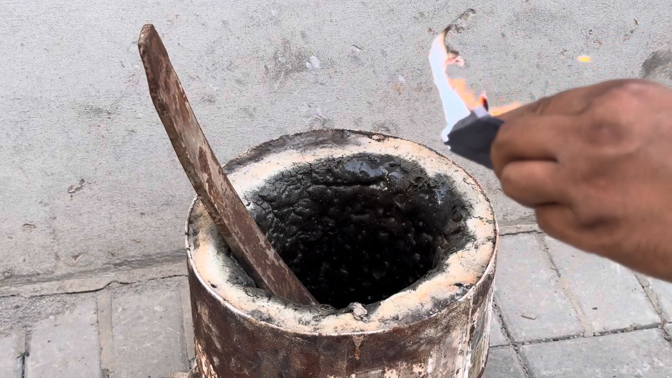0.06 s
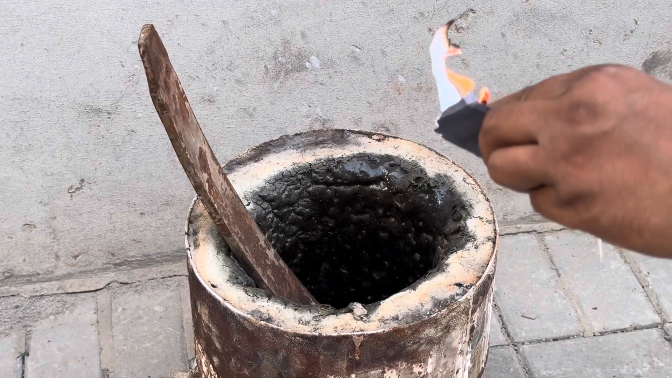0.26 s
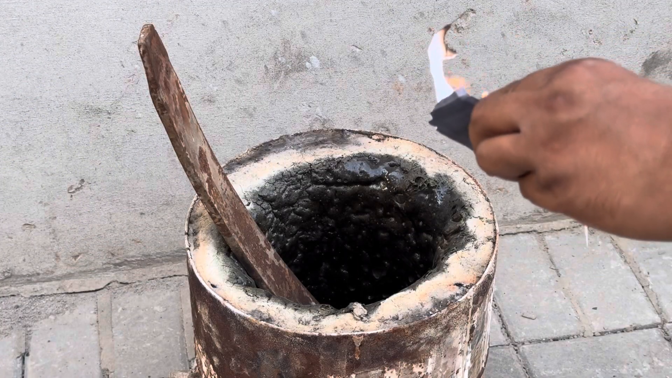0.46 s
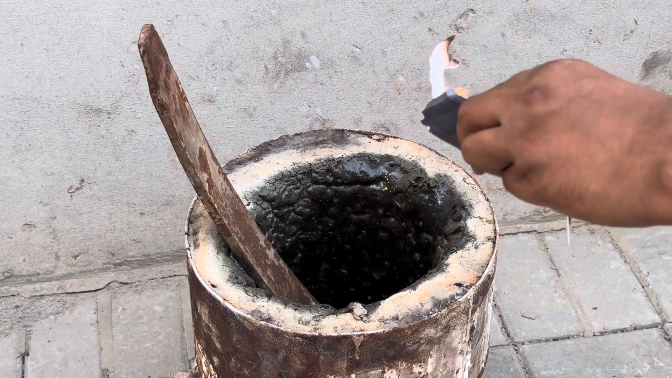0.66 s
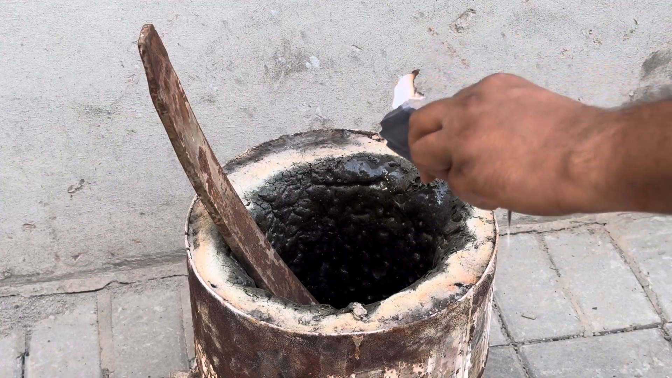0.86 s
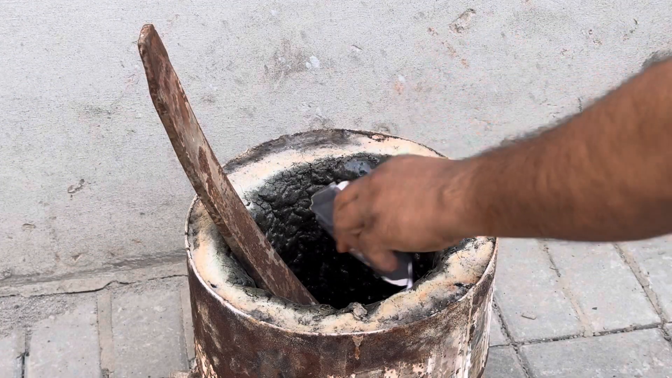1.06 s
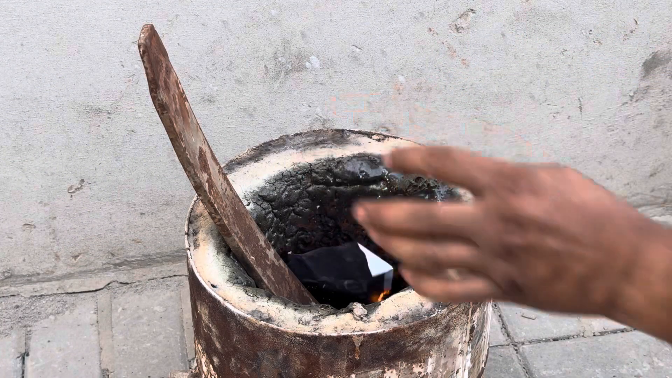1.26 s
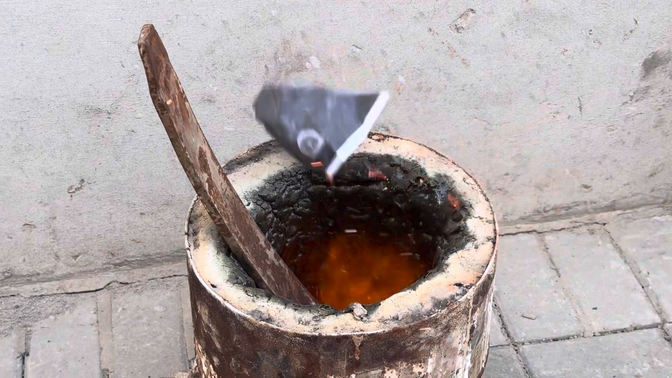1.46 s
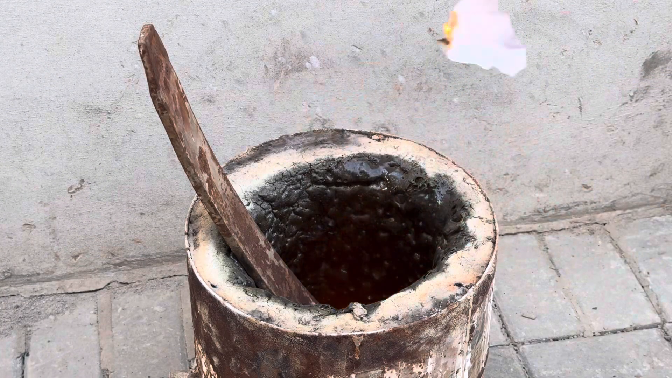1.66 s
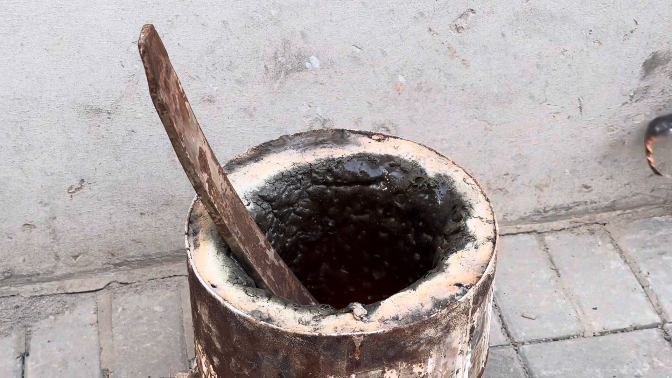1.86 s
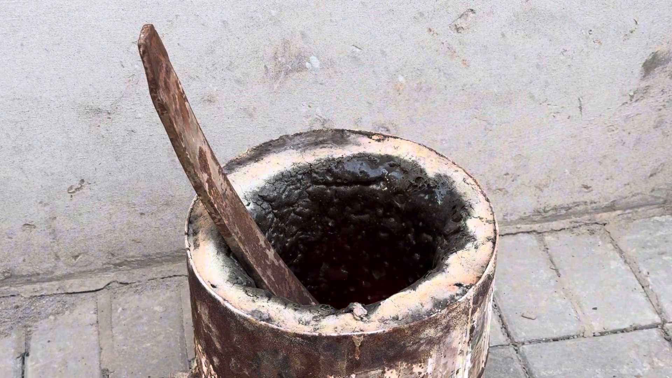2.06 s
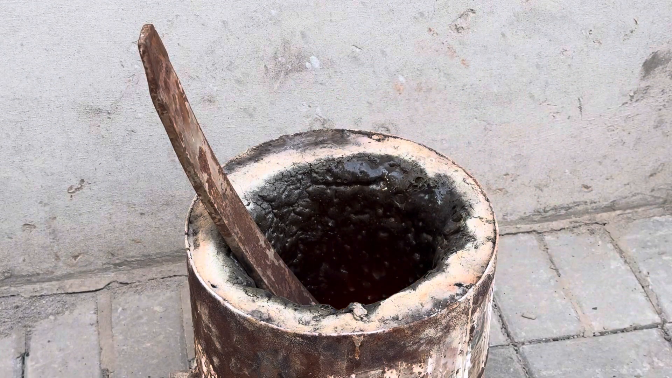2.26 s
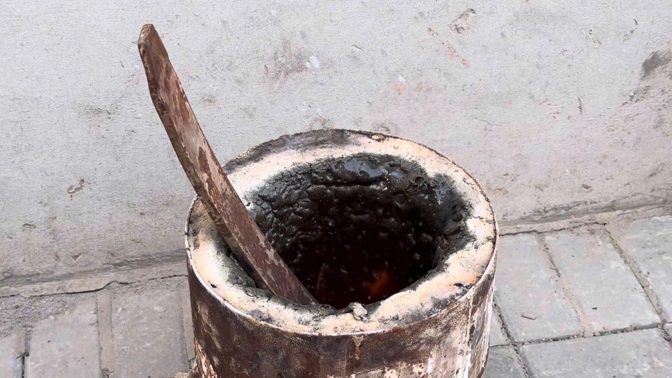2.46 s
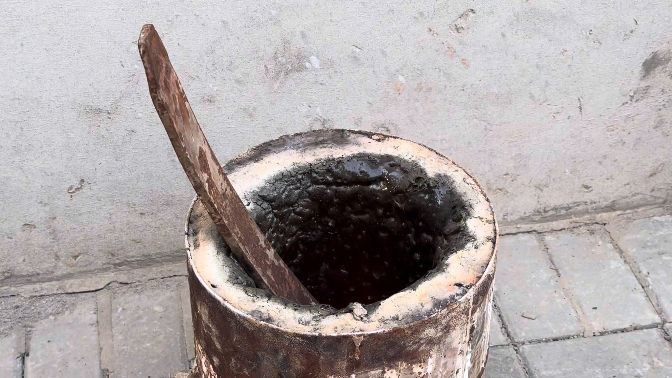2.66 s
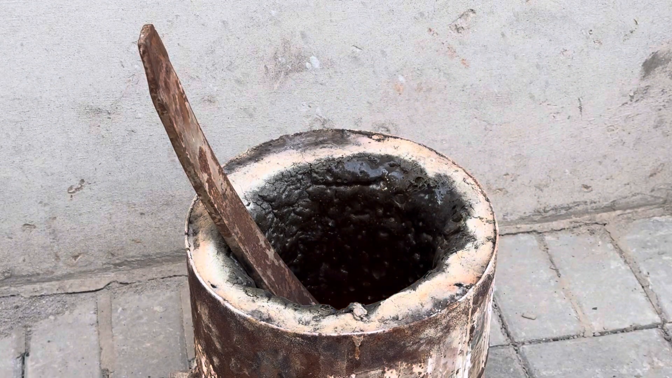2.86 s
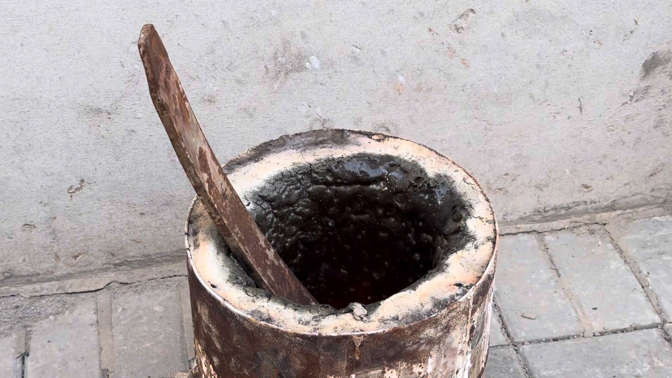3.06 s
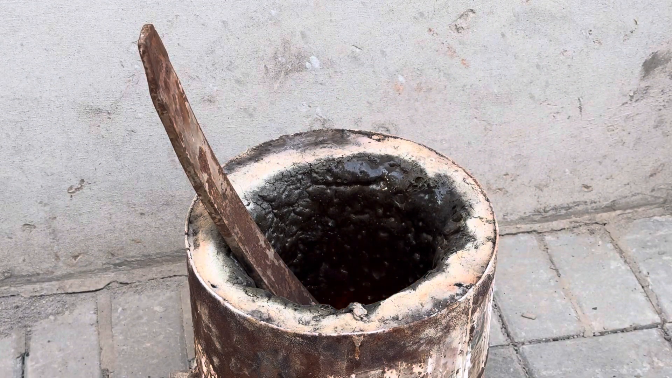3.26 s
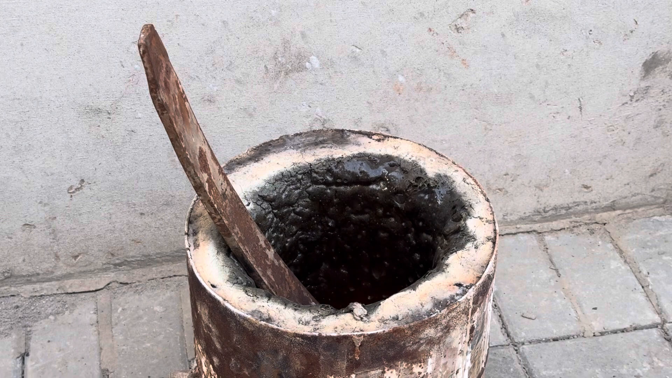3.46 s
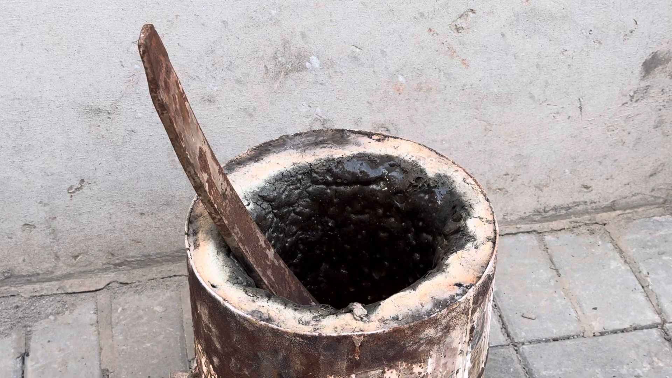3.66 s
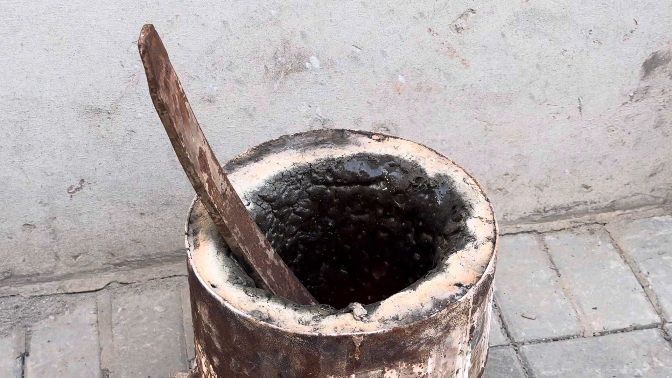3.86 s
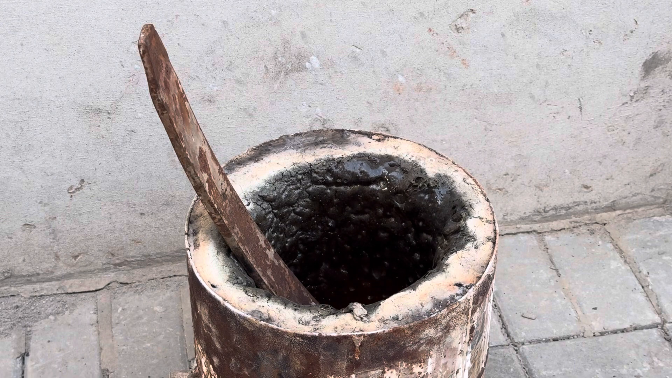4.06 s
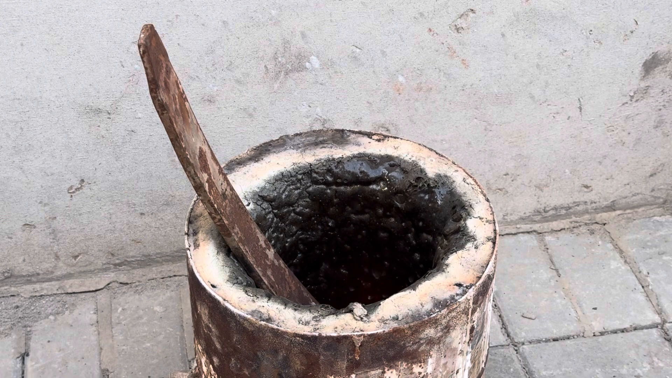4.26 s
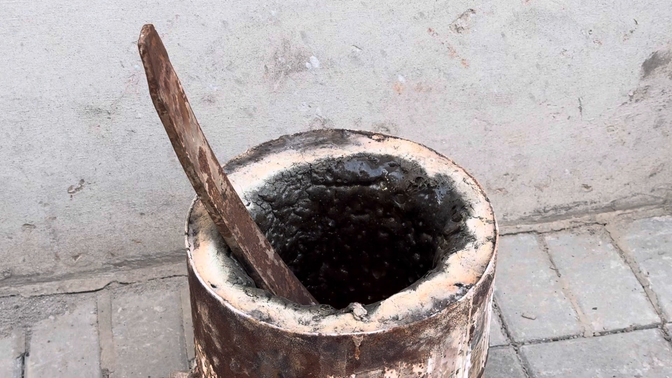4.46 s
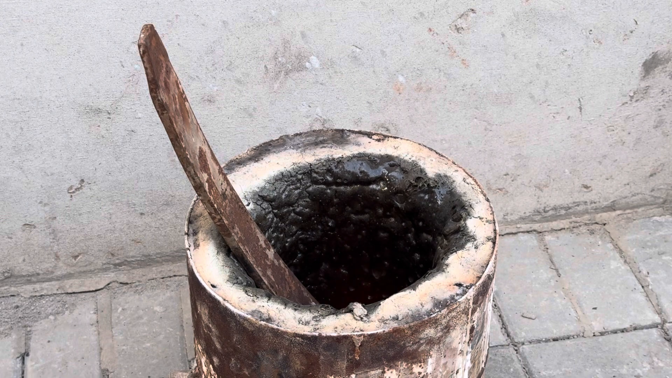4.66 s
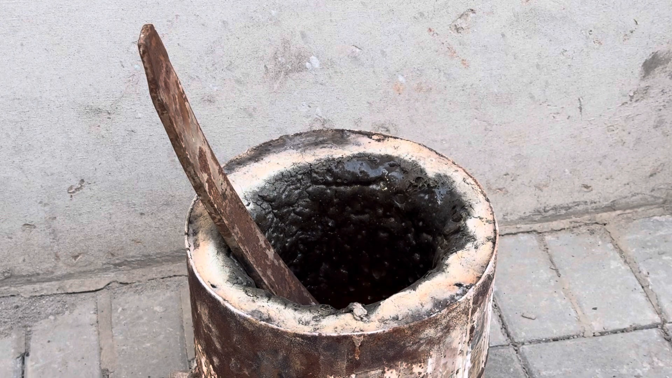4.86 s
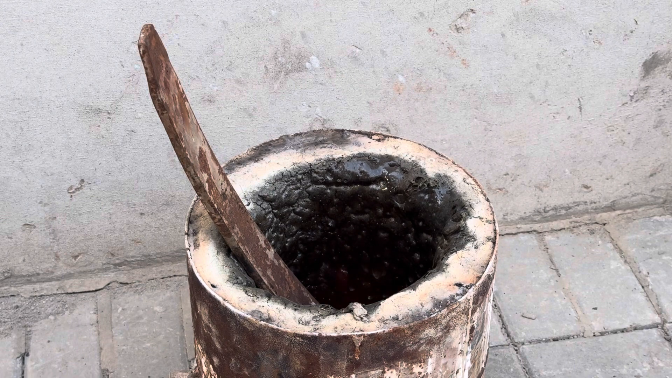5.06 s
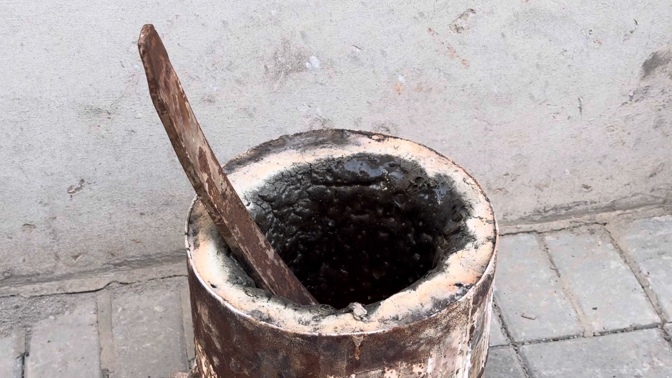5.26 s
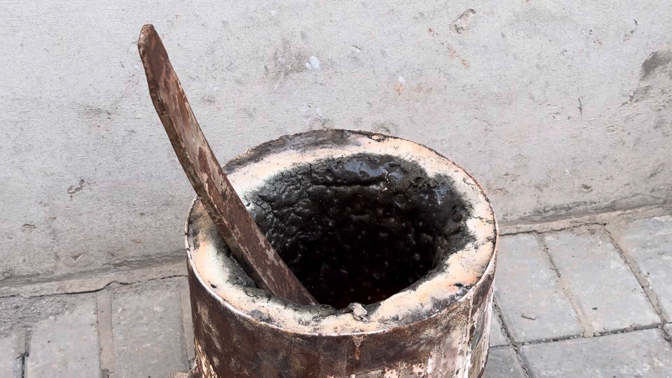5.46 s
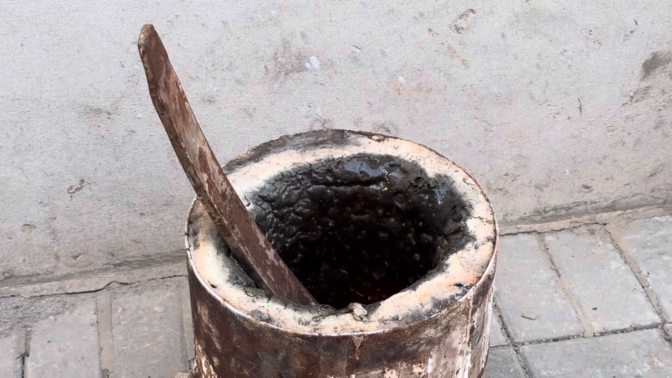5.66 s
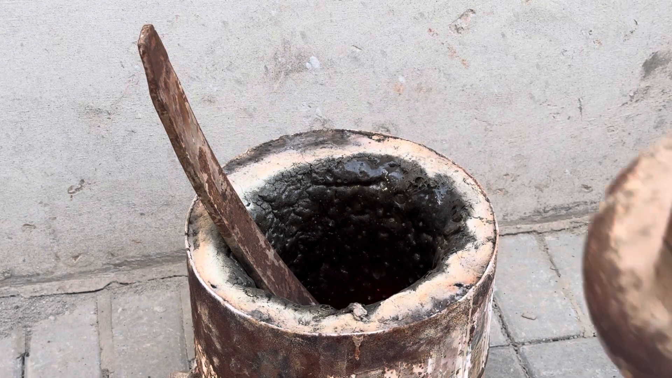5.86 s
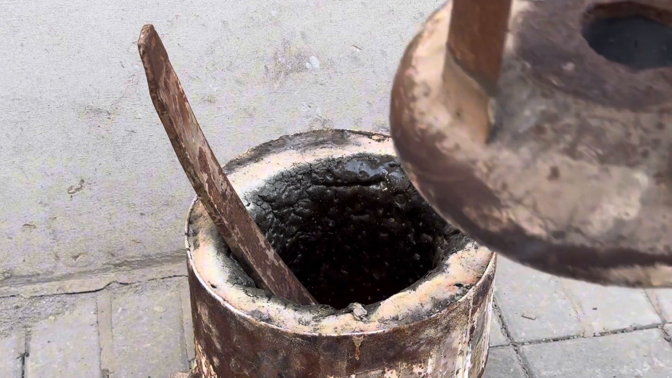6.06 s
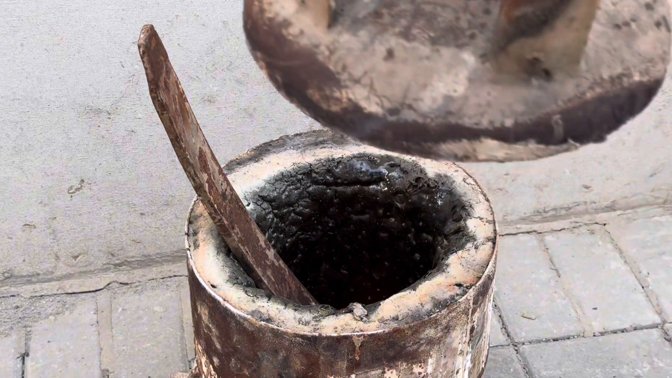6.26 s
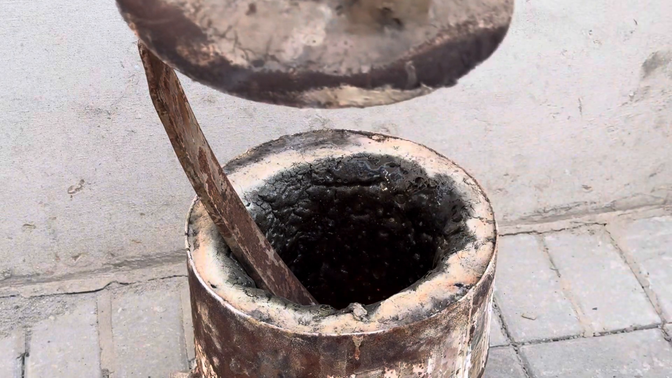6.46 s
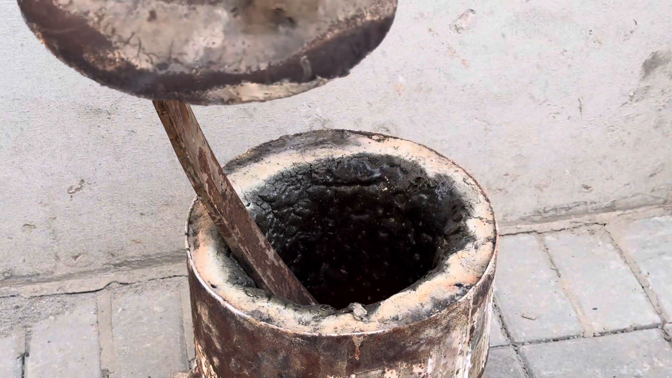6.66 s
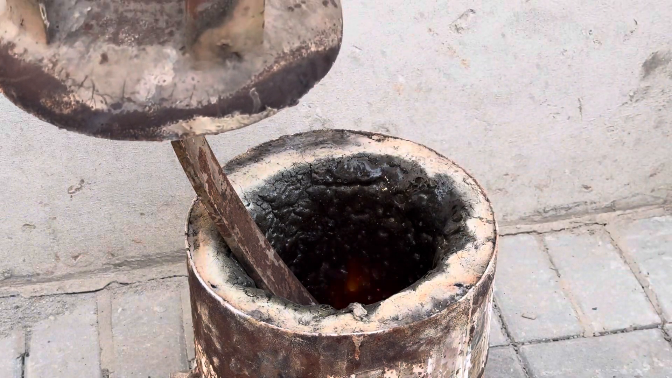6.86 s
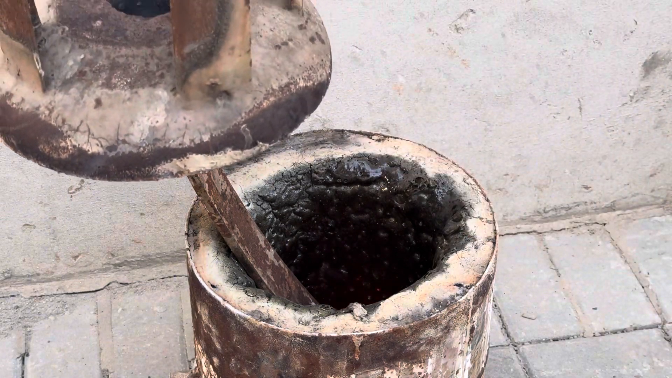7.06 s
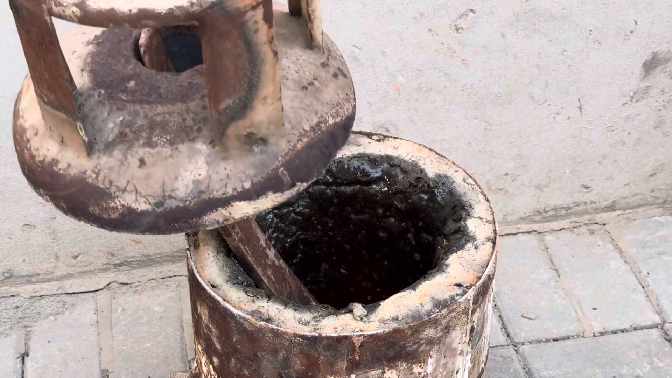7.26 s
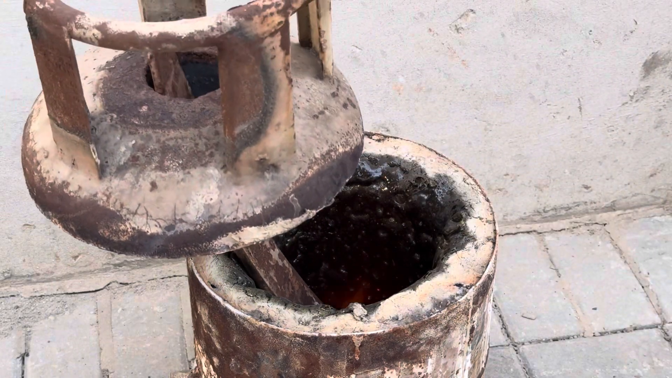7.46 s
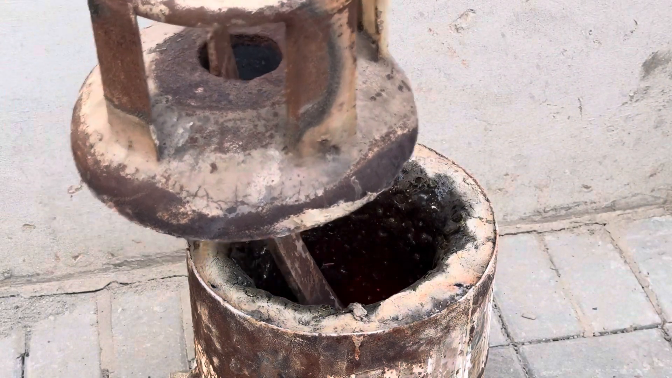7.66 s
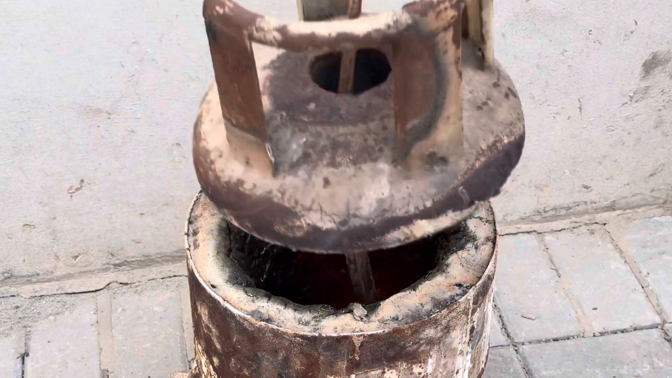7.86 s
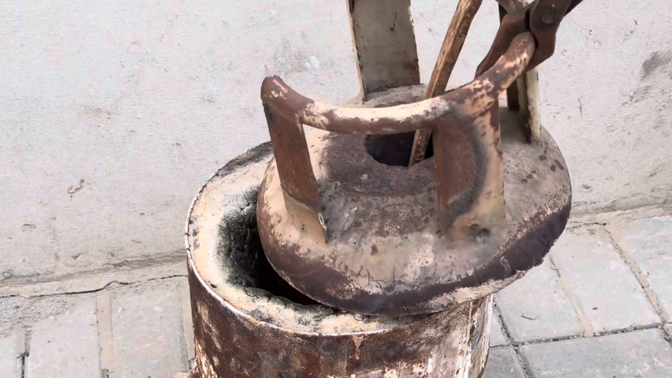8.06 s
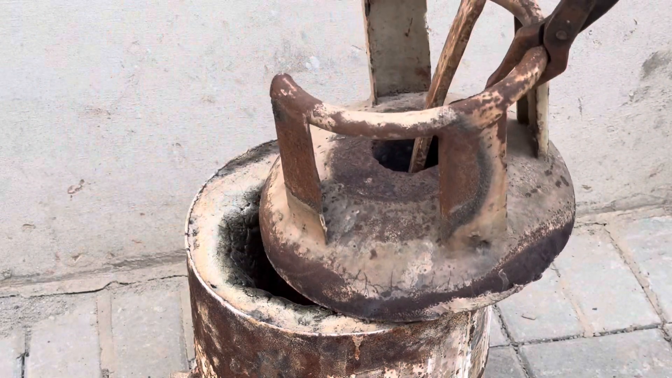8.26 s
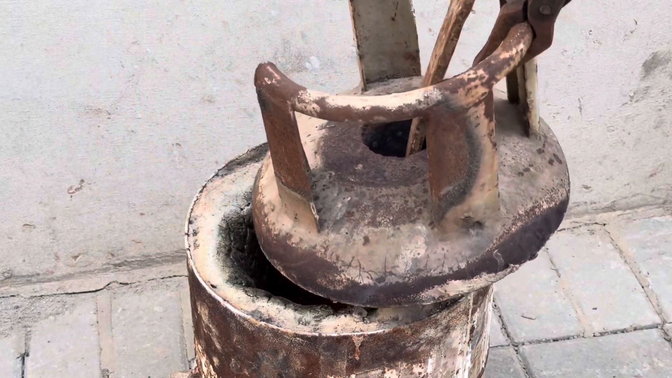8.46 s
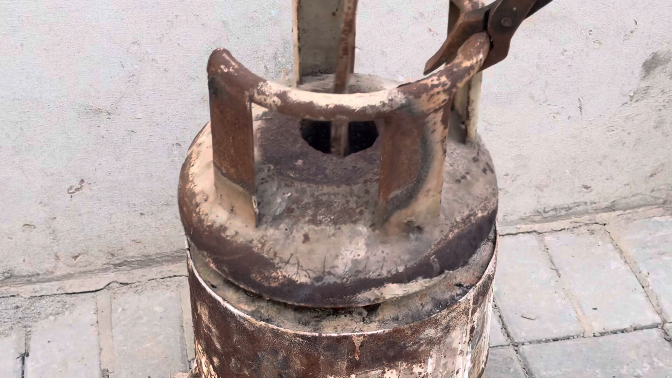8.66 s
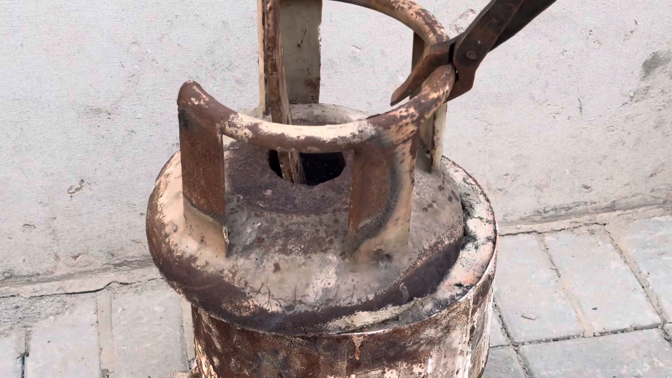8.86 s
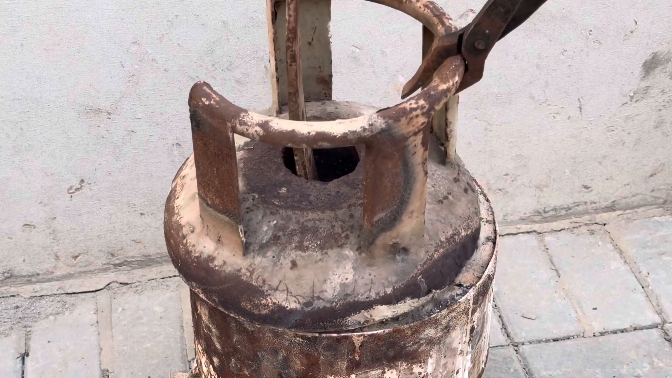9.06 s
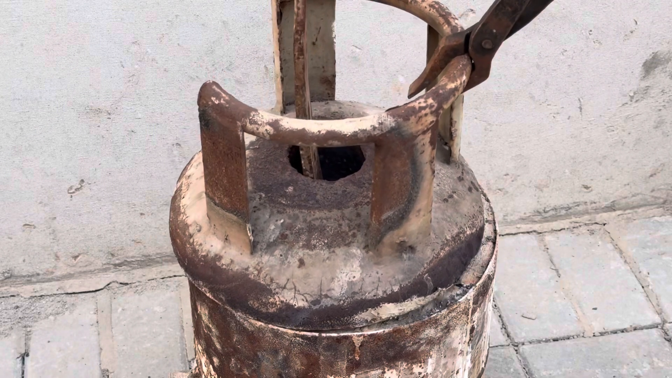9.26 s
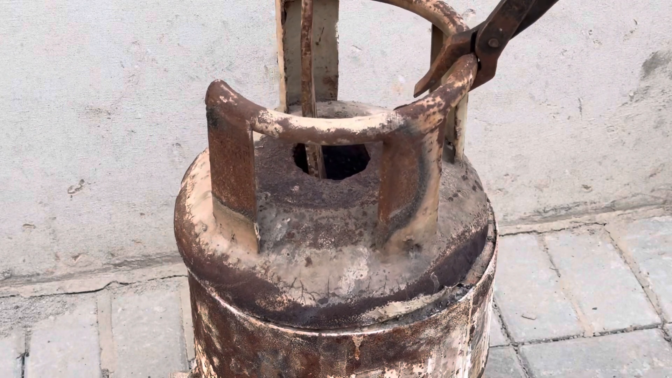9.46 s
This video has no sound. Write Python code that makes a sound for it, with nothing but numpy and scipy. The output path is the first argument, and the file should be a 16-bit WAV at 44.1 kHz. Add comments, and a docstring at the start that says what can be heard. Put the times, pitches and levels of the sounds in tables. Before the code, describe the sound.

Close view of a small gas forge outdoors: low paper-flame flutters and dry ticks, a growing pipe-like hiss with a faint hoot, then a hard burst and thump as the fire lights. Resonant roaring continues with a few early gulps and bright sizzle, slowly weakening. As the lid swings across, the tone shifts unevenly and ends darker and muffled.

```python
"""A gas burner in a clay-lined pot roars in a walled yard, after it is lit with a scrap of burning paper.
The paper's flame flutters as filtered noise with slow swings; the opening valve lets gas hiss and ring the pipe.
The gas catches with a whoomp of noise bursts and a thump, then noise in the pot's resonances roars on.
Later a steel cap comes down unevenly over the mouth: it shades the sizzle and deepens the roar."""
import sys
import numpy as np
from scipy import signal
from scipy.fft import rfft, irfft
from scipy.io import wavfile
from scipy.ndimage import uniform_filter1d

SR = 44100
rng = np.random.default_rng(int(sys.argv[2]) if len(sys.argv) > 2 else 0)


def pcm_store(signal):
    """Save signal as 16-bit PCM."""
    levels = np.round(np.clip(np.atleast_2d(signal), -1, 1) * 32767)
    wavfile.write(sys.argv[1], SR, levels.astype(np.int16).T)


N = 419391

TIME = np.arange(N) / SR  # s
BINS = np.fft.rfftfreq(N, 1 / SR) + 1e-3  # Hz, kept above zero
LIGHT_S = 1.308  # the gas catches
LIT_DROP_S = 0.024  # the hiss drops this fast once lit
FULL_HISS_DB = -36.5  # gas level with the valve fully open, before lighting
HISS_SETTLE_S = 0.8

# strength of the fire: (time [s], relative level [dB])
FIRE_STRENGTH = [(1.38, -11.5), (1.75, -13.5), (2.4, -17.5), (3.05, -19.4), (3.9, -18.5), (4.2, -20.5),
                 (4.45, -18.5), (5.1, -19), (6.05, -21.5), (6.9, -19.5), (7.6, -20.5), (8.15, -23.5),
                 (8.5, -20.5), (8.75, -23), (9.5, -26)]
# the cap comes down: (time [s], share of the mouth covered [0-1])
CAP_COVER = [(6.7, 0.05), (7.5, 0), (7.9, 0.23), (8.25, 0.59), (8.55, 0.27), (8.75, 0.75), (9.15, 0.84),
             (9.5, 0.95)]


def undb(db):
    """Decibels to gain."""
    return 10 ** (np.asarray(db) / 20)


def curves(rows, at=TIME):
    """Each column of a table, joined by straight lines in time."""
    s, *columns = np.transpose(rows)
    return [np.interp(at, s, c) for c in columns]


def across(points):
    """A spectrum joined by straight lines in log frequency."""
    hz, value = np.transpose(points)
    return np.interp(np.log(BINS), np.log(hz), value)


def fade_in(start, length):
    """A straight rise from 0 to 1; times in seconds."""
    return np.clip((TIME - start) / length, 0, 1)


def walk(rate):
    """Random wandering with a spread near 1, heading for rate new targets a second."""
    k = int(SR / rate)
    targets = np.repeat(rng.standard_normal(N // k + 1), k)
    return 1.1 * uniform_filter1d(targets, k)[:N]


def peak(f, hz, width):
    """Gain of a resonance with steep skirts, down to half at hz plus or minus about width / 2."""
    return 1 / (1 + ((f * f - hz * hz) / (f * width)) ** 2)


def ringing(modes):
    """Joint gain of several resonances, summed as power."""
    return np.sqrt(sum((undb(db) * peak(BINS, hz, width)) ** 2 for hz, width, db in modes))


def notched(x, nulls):
    """Sound with valleys cut at the pitches that cancel."""
    gain = np.prod([1 - min(depth, 1) * peak(BINS, hz, width) for hz, width, depth in nulls], axis=0)
    return irfft(rfft(x) * gain, N)


def noise(gain):
    """Turbulence: random noise whose amplitude density over frequency follows the gain."""
    return irfft(rfft(rng.standard_normal(N)) * gain, N) * np.sqrt(SR / 2)


def steady(x, span):
    """Unit level over span seconds; faster flicker stays."""
    power = uniform_filter1d(x * x, int(span * SR) + 1)
    return x / np.sqrt(np.abs(power) + 1e-18)


def swing(s, db, hz, length):
    """A few swings of pressure as a pocket of flame swells and collapses."""
    out, near = np.zeros(N), np.abs(TIME - s) < 4 * length
    t = TIME[near] - s
    out[near] = undb(db) * np.exp(-(t / length) ** 2) * np.cos(2 * np.pi * hz * t)
    return out


def settling(flare_db, settled_db, settle):
    """A level that holds while the fresh fire flares, then moves to its steady value."""
    flare_hold_s = .42
    since = np.maximum(TIME - LIGHT_S - flare_hold_s, 0)
    return settled_db + (flare_db - settled_db) * np.exp(-since / settle)


def overhead(arrives_s=6.53, swing_s=.5):
    """Share of the cap that hangs over the pot as it swings in above it."""
    return fade_in(arrives_s, swing_s)


def yard():
    """The quiet of the yard: steady noise, darkest at the top."""
    # background spectrum: (frequency [Hz], level [dB])
    quiet = [(20, -78.5), (100, -65), (160, -73.5), (215, -68), (300, -77), (550, -80.5), (1000, -87.5),
             (2000, -95), (4000, -107), (7000, -113), (15000, -122)]
    return noise(undb(across(quiet)))


def diffuse_tail(x, t60=.45):
    """A diffuse decaying tail of coloured noise, cut at half a second, that widens the sound."""
    # tail colour: (frequency [Hz], level [dB])
    tail_colour = [(60, -28), (110, -29), (200, -10.5), (380, -18), (550, -14.5), (780, -7.5), (1000, -17),
                   (1450, -19), (2800, -37), (5000, -42.5), (9000, -32), (15000, -15)]
    tail = rng.standard_normal(N) * undb(-60 * TIME / t60)
    tail = irfft(rfft(tail / np.linalg.norm(tail)) * undb(across(tail_colour)), N)
    return signal.fftconvolve(x, tail[:SR // 2])[:N]


def ticks():
    """The paper crackles and the valve ticks: short dry noise snaps, each with its own colour."""
    # snaps: (start [s], level [dB], pitch [Hz], width [Hz], decay [s])
    snaps = [(.012, -54, 5500, 9000, .003), (.046, -43, 4160, 7000, 0.0037),
             (.408, -57, 5000, 6000, 0.0089), (.802, -31.5, 4850, 2500, .004), (.871, -34, 997, 600, .008),
             (.954, -36, 1100, 900, .008), (1.029, -29.5, 3200, 4500, 0.0045)]
    out, t = np.zeros(N), np.arange(4096) / SR
    f = np.fft.rfftfreq(len(t), 1 / SR) + 1
    for s, db, hz, width, decay in snaps:
        snap = irfft(rfft(rng.standard_normal(len(t))) * peak(f, hz, width))
        start = max(int(s * SR), 0)
        out[start:start + len(t)] += undb(db) * snap / snap.std() * np.exp(-t / decay)
    return out


def paper(still_db=-48, attack_s=0.017, release_s=.04):
    """Low narrow noise flutters in each draught until the gas catches; slow swings are the flame's flaps."""
    # draughts on the burning paper: (start [s], length [s], added flutter [dB])
    draughts = [(.26, .2, -37.5), (0.963, .33, -34.5)]
    # the paper's flame flaps: (time [s], peak [dB], pitch [Hz], half length [s])
    flaps = [(0.286, -23, 68, 0.02), (0.389, -31, 50, .03), (0.641, -25, 68, 0.015)]
    draught = undb(still_db)
    for s, length, db in draughts:
        release = np.exp(-np.maximum(TIME - s - length, 0) / release_s)
        draught = draught + undb(db) * fade_in(s, attack_s) * release
    flutter = steady(noise(peak(BINS, 65.1, 58)), 0.12) * draught
    return flutter * (TIME < LIGHT_S) + sum(swing(*flap) for flap in flaps)


def gas_level(growth_db_per_tenfold=19, sag_db_per_s=-0.34):
    """Level of the jet in dB: it grows with the evenly turned valve, drops as the gas lights and sinks on."""
    valve_s, lit_db, settled_db = 0.41, -44.5, -55  # valve starts to open; level once lit, level at the end
    opening = fade_in(valve_s, LIGHT_S - valve_s)
    unlit = FULL_HISS_DB + growth_db_per_tenfold * np.log10(opening + 1e-9)
    lit = fade_in(LIGHT_S, LIT_DROP_S)
    sag = sag_db_per_s * (TIME - TIME[-1]) * settling(0, 1, HISS_SETTLE_S)  # reaches zero at the end
    return (1 - lit) * unlit + lit * (settling(lit_db, settled_db, HISS_SETTLE_S) + sag)


def jet(hoot_growth=0.31, throb_hz=14, throb_db=2.5, pipe_lit_db=-2.5, thrown_db=-1):
    """Gas hisses from the nozzle as noise and rings the burner pipe, later the cap as well."""
    # hiss spectrum: (frequency [Hz], relative level [dB])
    hiss_colour = [(100, -70), (400, -46), (1000, -45), (1800, -40.5), (3450, -45), (5700, -40.5),
                   (7500, -42), (10000, -40), (15500, -40.5)]
    # resonances, all (pitch [Hz], width [Hz], relative level [dB]): thin whistles in the nozzle's hiss,
    nozzle_modes = [(7430, 500, -36), (7500, 260, -49), (10160, 450, -35), (10880, 480, -33.5),
                    (11860, 420, -35.5), (12850, 650, -34.5), (14300, 700, -36.5), (15200, 700, -37.5)]
    # the burner pipe,
    pipe_modes = [(1457, 102, -23.5), (2310, 260, -33), (2766, 203, -23), (2957, 130, -24.5),
                  (4005, 400, -33.5), (4720, 180, -37), (6750, 420, -36.5)]
    # the hollow under the cap,
    cap_modes = [(2310, 230, -28), (2590, 200, -35), (3800, 420, -30), (4720, 170, -31.5), (7100, 300, -40)]
    # and the pipe's lowest resonances, which hoot as the flow grows
    hoot_modes = [(646.5, 50, -11.5), (550, 100, -24)]
    gas_db = gas_level()
    hiss = noise(np.hypot(undb(across(hiss_colour)), ringing(nozzle_modes))) * undb(0.54 * walk(50))
    filled = fade_in(0.454, 0.12)  # the pipe speaks once the gas has filled it
    pipe_db = pipe_lit_db * fade_in(LIGHT_S, LIT_DROP_S) + 0.62 * walk(30)
    pipe = noise(ringing(pipe_modes)) * undb(pipe_db) * filled
    # the cap throws back only the upper resonances
    thrown = noise(ringing(pipe_modes[1:])) * undb(thrown_db) * overhead()
    cap = noise(ringing(cap_modes)) * curves(CAP_COVER)[0]
    throb = throb_db * np.sin(2 * np.pi * throb_hz * TIME + walk(5))  # never quite even
    # hoot_growth: dB of hoot, over the common gas level, per dB of gas
    hoot = noise(ringing(hoot_modes)) * undb(throb + hoot_growth * (gas_db - FULL_HISS_DB))
    return (hiss + pipe + thrown + cap + hoot) * undb(gas_db)


def whoomp(burst_db=-7, flash_db=-20, thump_db=-5, thump_hz=65, thump_lag=0.0086,
           rise=.014, fall=0.022, flash_fall=0.0058):
    """The pooled gas burns all at once: a brief bright flash and a longer dull burst around a deep thump."""
    # colours of flash and burst: (frequency [Hz], relative level [dB])
    flash_colour = [(100, -20), (400, 2), (1000, -4), (1600, -4), (2400, -14), (6000, -23), (15000, -27)]
    burst_colour = [(20, -14), (60, -6), (130, 4), (220, -2), (330, 0), (520, -3), (800, -25), (1500, -39),
                    (6000, -62)]
    t = TIME - LIGHT_S
    flash_shape = np.exp(np.minimum(t / rise, -t / flash_fall))
    flash = steady(noise(undb(across(flash_colour))), .01) * flash_shape
    burst_shape = np.exp(np.minimum(t / rise, -t / fall))
    burst = steady(noise(undb(across(burst_colour))), 0.0076) * burst_shape
    thump = swing(LIGHT_S + thump_lag, thump_db, thump_hz, 0.015)
    return undb(flash_db) * flash + undb(burst_db) * burst + thump


def pot(modes):
    """Turbulence in the pot; its resonances shift as the cap covers the mouth."""
    f, t, z = signal.stft(rng.standard_normal(N), SR, nperseg=2048)
    cover = np.clip(curves(CAP_COVER, t)[0], 0, 1)
    power = 0
    for opened, covered in np.reshape(modes, (len(modes), 2, -1)):
        hz, width, db = opened[:, None] + np.outer(covered - opened, cover)
        power = power + (undb(db) * peak(f[:, None] + 1, hz, width)) ** 2
    return signal.istft(z * np.sqrt(power), SR)[1][:N]


def hollow(x):
    """Valleys between the resonances give the pot its hollow sound; the cap above adds more."""
    # pitches that cancel in the pot: (pitch [Hz], width [Hz], depth [0-1])
    pot_nulls = [(219, 37, 0.38), (795, 143, 0.58), (1344, 110, .42), (1920, 280, 0.41)]
    # pitches that cancel in the gap between cap and pot: (pitch [Hz], width [Hz], depth [0-1])
    gap_nulls = [(500, 50, 0.41), (850, 72, 0), (1320, 140, 0.5)]
    x = notched(x, pot_nulls)
    return x + overhead() * (notched(x, gap_nulls) - x)


def rumble(flare_db=-21.5, settled_db=-30, settle_s=1.33):
    """The pot's lowest resonances start strong and settle slowly."""
    # (open pitch [Hz], width [Hz], relative level [dB], covered pitch [Hz], width [Hz], relative level [dB])
    low_modes = [(101, 60, 0.5, 107, 76, 1), (157.2, 65, -2.5, 164, 61, 3)]
    return steady(pot(low_modes), .3) * undb(settling(flare_db, settled_db, settle_s))


def roar(trim_db=0.31):
    """The pot's middle resonances follow the strength of the fire."""
    # (open pitch [Hz], width [Hz], relative level [dB], covered pitch [Hz], width [Hz], relative level [dB])
    middle_modes = [(273.7, 37, -1, 272.4, 41, 0.5), (341, 29, 3, 338, 31, -3.5),
                    (413.6, 129, -1, 337, 135, -13.5), (513, 143, -8, 442, 140, -16),
                    (610, 132, -17.5, 640, 160, -22.5)]
    return steady(pot(middle_modes), .24) * undb(curves(FIRE_STRENGTH)[0] + trim_db)


def overtones(trim_db=-23.5, shade_db=-1.5):
    """The pot's high resonances follow the roar and swell as the cap's rim sweeps across the mouth."""
    # (open pitch [Hz], width [Hz], relative level [dB], covered pitch [Hz], width [Hz], relative level [dB])
    high_modes = [(941, 154, 1, 980, 190, 2.5), (1115, 265, -4, 1175, 210, 4.5),
                  (1460, 84, -3.5, 1465, 38, -2.5), (1620, 240, -10, 1100, 350, -29.5)]
    # sweeps of the rim: (time [s], half length [s], swell [dB])
    rim_passes = [(7.834, 0.1, 4.5), (8.64, .08, 3.5)]
    swell_db = sum(db * np.exp(-((TIME - s) / length) ** 2) for s, length, db in rim_passes)
    level_db = curves(FIRE_STRENGTH)[0] + trim_db + swell_db + shade_db * curves(CAP_COVER)[0]
    return steady(pot(high_modes), 0.29) * undb(level_db)


def sizzle(trim_db=1.24, sputter_db=1.2, surge_db=1.04, shade_db=-20):
    """Resonant treble noise at the flame's root; treble travels straight, so the cap shades it."""
    # resonances that colour the sizzle: (pitch [Hz], width [Hz], relative level [dB])
    root_modes = [(2260, 320, -1.5), (2650, 500, -3.5), (3300, 370, 0), (3745, 380, 0), (4300, 400, -6),
                  (4776, 420, -1), (5380, 690, -6), (6460, 2100, -10.5)]
    # sizzle level, already dulled as the cap swings over; trim and further shading are added:
    # (time [s], relative level [dB])
    sizzle_levels = [(1.39, -40.5), (1.78, -41), (2.05, -44.5), (2.4, -51.5), (2.7, -46.5), (5.5, -48.5),
                     (5.85, -50.5), (6.25, -49.5), (6.65, -47), (6.95, -53.5), (7.2, -52.5), (7.55, -54),
                     (7.8, -55)]
    level_db = curves(sizzle_levels)[0] + trim_db + shade_db * curves(CAP_COVER)[0]
    level_db = level_db + sputter_db * walk(90) + surge_db * walk(12)
    onset = fade_in(LIGHT_S + .055, .03)  # just after the whoomp
    return steady(noise(ringing(root_modes)), .2) * undb(level_db) * onset


def gulps():
    """The fire's biggest gulps: pockets of flame that swing the pressure."""
    # (time [s], peak before the pot's valleys [dB], pitch [Hz], half length [s])
    pockets = [(1.339, -4, 484, 0.0048), (2.14, -8.5, 350, 0.005), (2.339, -6, 404, 0.0049),
               (5.327, -12, 382, .005), (9.108, -13.5, 281, 0.018)]
    return sum(swing(*pocket) for pocket in pockets)


def fire(flicker_db=0.5, choke_db=0.4):
    """The flame rumbles, roars through the pot's resonances, sizzles at its root and gulps."""
    # rumble, roar and overtones flicker together, and burn less evenly under the cap
    flicker = flicker_db * walk(70) + choke_db * curves(CAP_COVER)[0] * walk(16)
    body = (rumble() + roar() + overtones()) * undb(flicker)
    return hollow(fade_in(1.3, 0.042) * (body + sizzle()) + gulps())


def scene():
    """The burner straight ahead over the quiet yard; the tail has opposite polarity left and right."""
    direct = yard() + ticks() + paper() + jet() + whoomp() + fire()
    return direct + np.array([[1], [-1]]) * diffuse_tail(direct)


def record(dry, top_hz=15700):
    """The treble is out of step between left and right; the loudest peaks are rounded and the top is cut."""
    # lead of the left channel over the right: (frequency [Hz], phase [rad])
    treble_phase = [(6750, 0), (7400, 1.53), (7750, 3.5), (9300, 3), (10000, 2), (11500, 2), (12900, 1.4),
                    (13600, 1.1), (14000, 0)]
    lead = np.exp(.5j * np.outer([1, -1], across(treble_phase)))
    sides = irfft(rfft(dry) * lead, N)
    rounded = sides / (1 + sides ** 6) ** (1 / 6)
    return signal.sosfilt(signal.ellip(10, .2, 80, top_hz, fs=SR, output="sos"), rounded)


dry = scene()
out = record(dry)
pcm_store(out)
```